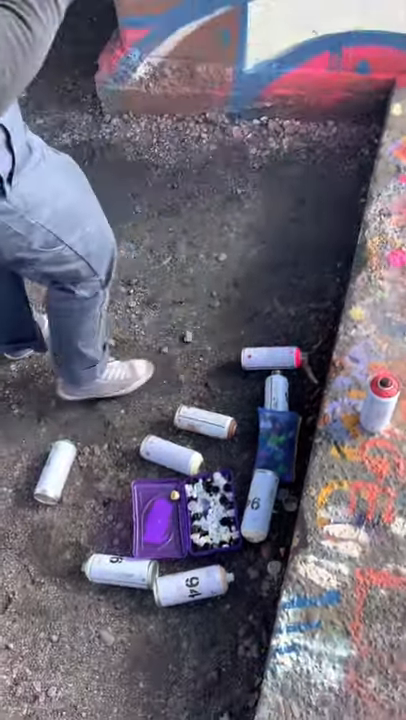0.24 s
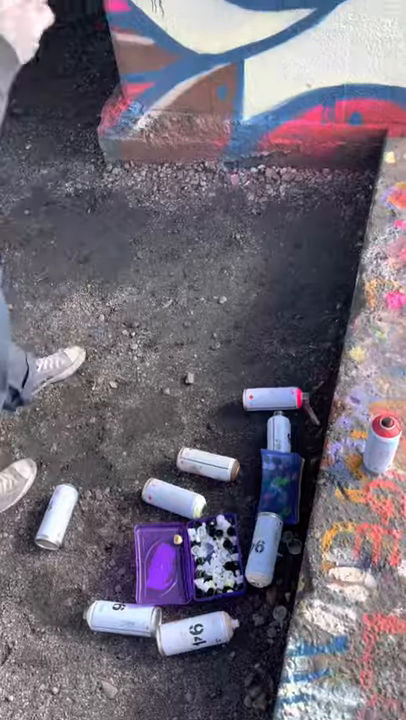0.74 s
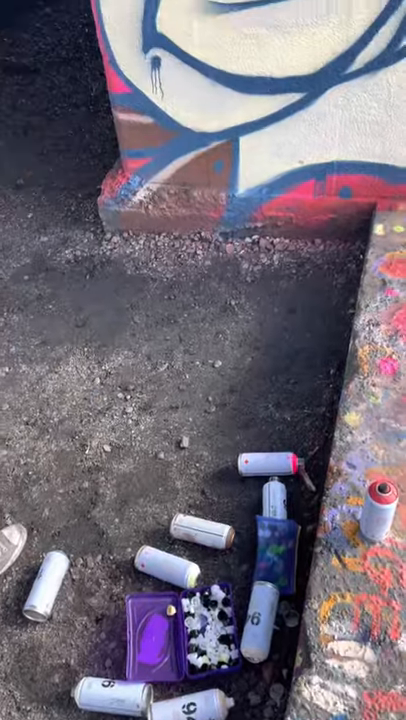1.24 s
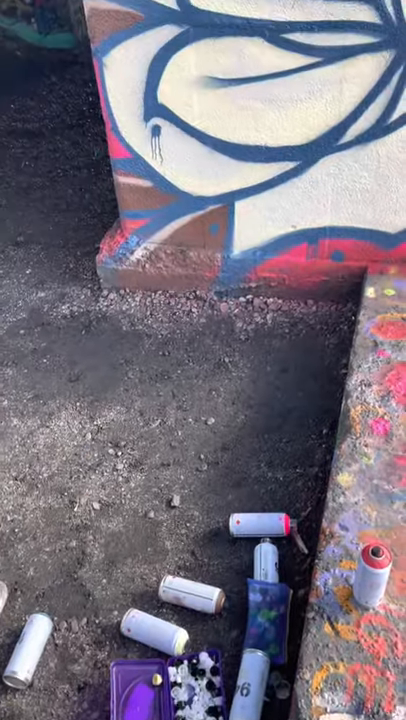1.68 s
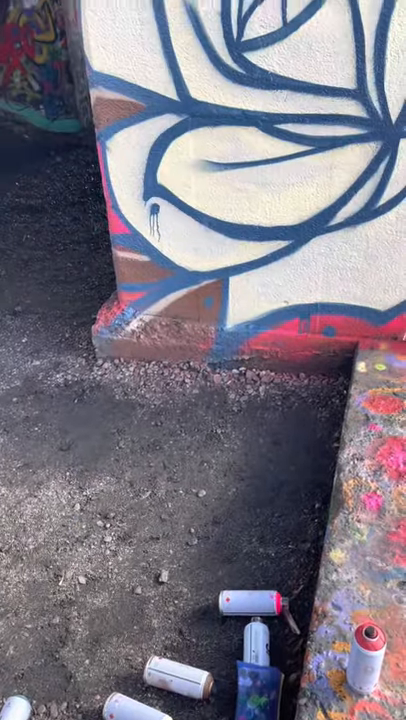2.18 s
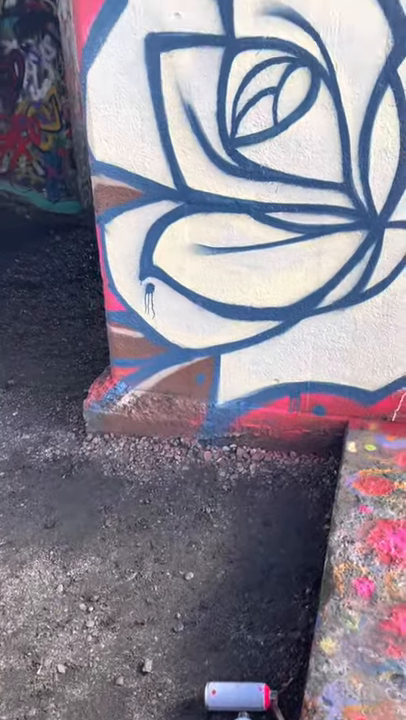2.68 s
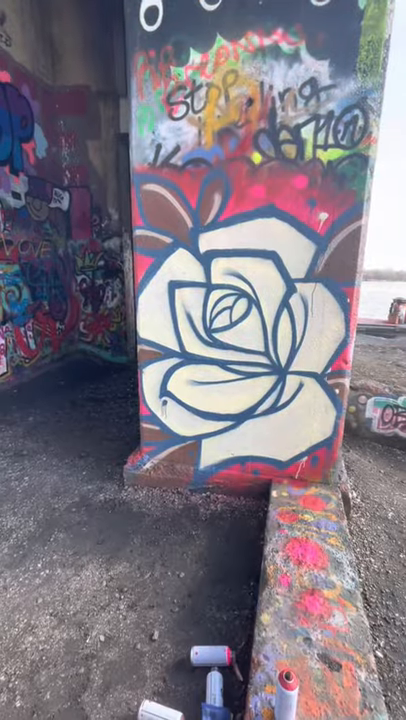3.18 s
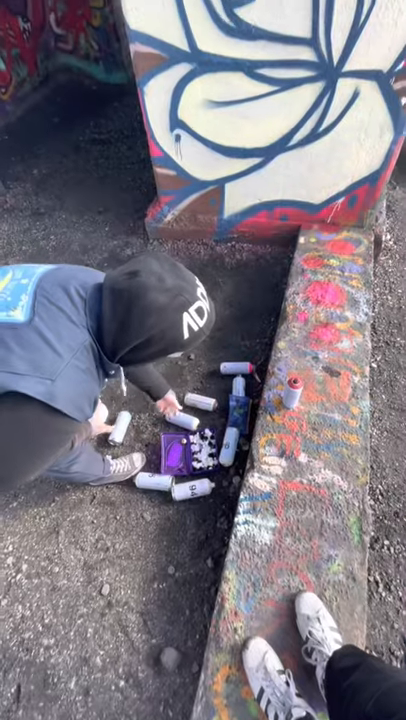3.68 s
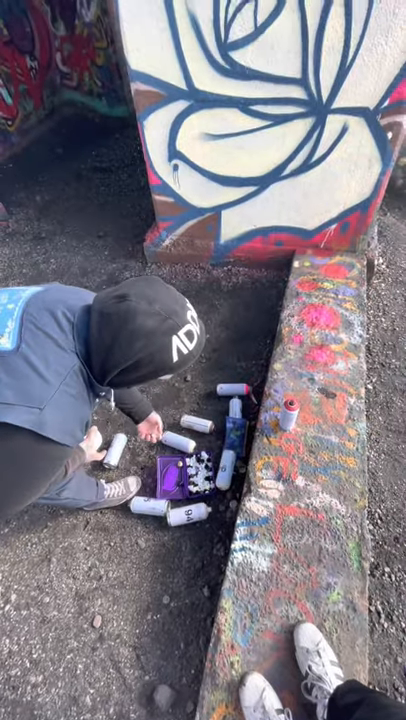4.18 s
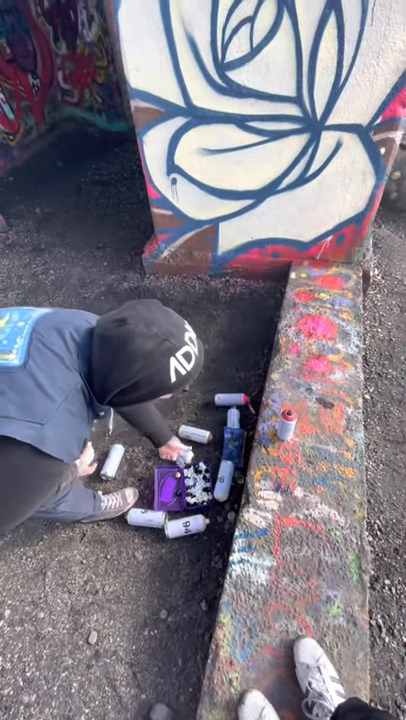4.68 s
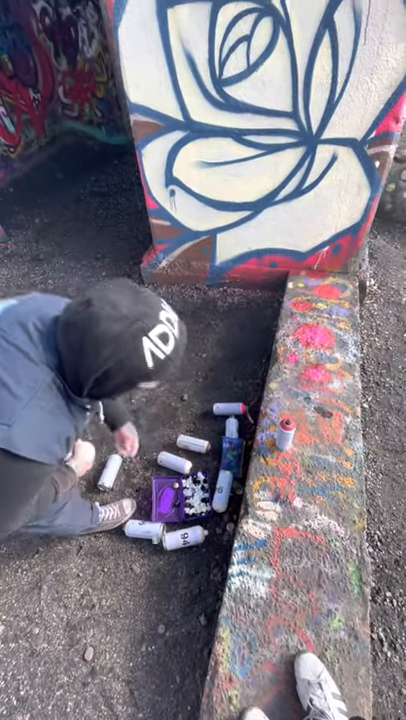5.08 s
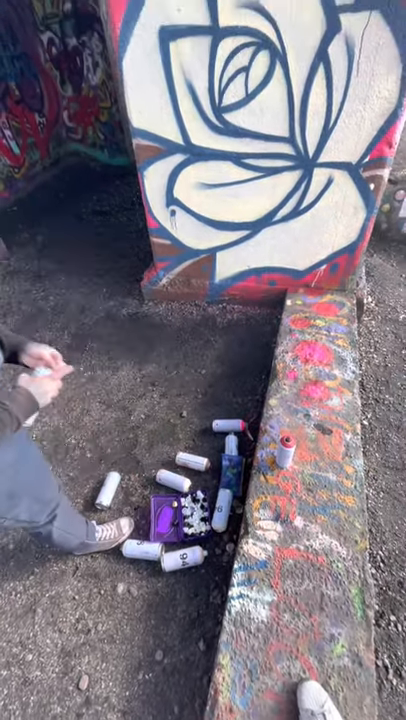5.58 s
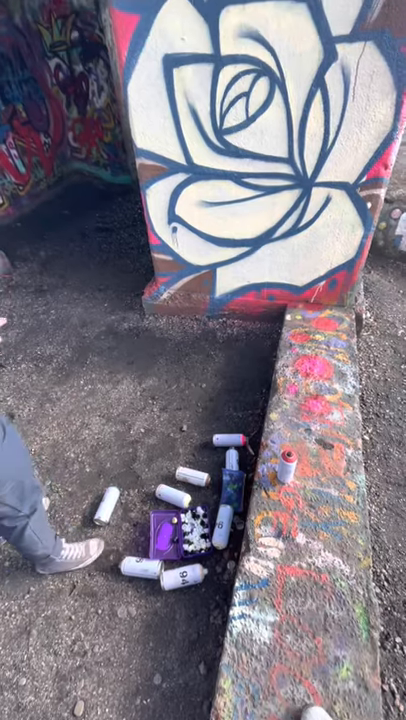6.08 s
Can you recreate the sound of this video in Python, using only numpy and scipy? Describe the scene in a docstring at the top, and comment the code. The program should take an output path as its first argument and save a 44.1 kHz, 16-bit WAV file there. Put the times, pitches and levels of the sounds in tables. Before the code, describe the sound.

Outdoors beside concrete, a spray paint can is shaken close by: its mixing ball clatters in a fast, uneven, bright metallic run with a short grainy echo. The rattle stops abruptly near the middle. After a brief lull, cans and caps are handled on the ground with scattered ticks, hollow knocks and faint short rings. Wind flutters and pops on the phone microphone.

```python
"""Spray can and caps in the wind

A spray paint can is shaken beside a concrete shelter: its mixing ball strikes and skips along the shell,
each contact a burst of noise through the can's resonances, with a grainy echo from the concrete.
Then cans and caps are picked through on the ground: filtered ticks, hollow knocks and short sine rings.
Wind flutters and pops on the microphones throughout, as shaped noise bursts, over a fine rustle
of cloth and grit and a faint, steady outdoor wash of filtered noise.
"""
import sys
import numpy as np
from scipy import signal
from scipy.fft import rfft, irfft
from scipy.io import wavfile
from scipy.ndimage import uniform_filter1d

SR = 44100
rng = np.random.default_rng(int(sys.argv[2]) if len(sys.argv) > 2 else 0)


def transcribe(signal):
    """Save signal, clipped to [-1, 1], as a 16-bit WAV file at the path in sys.argv[1]."""
    frames = np.atleast_2d(signal).T
    limited = np.clip(frames, -1, 1)
    pcm = np.round(limited * 32767).astype(np.int16)
    wavfile.write(sys.argv[1], SR, pcm)


N = 279594
TIME = np.arange(N) / SR

# every short hit has its own frame, in samples, with a little silence ahead of the onset
HIT, LEAD = 4096, 256
HIT_TIME = (np.arange(HIT) - LEAD) / SR
HIT_HZ = np.fft.rfftfreq(HIT, 1 / SR) + 1

# Wall modes of the shaken can.
# Each row: frequency in Hz, half width in Hz, peak in dB over the broad response.
WALL_MODES = [(3950, 150, 0), (4380, 65, -7), (4980, 40, -4), (5250, 50, -5), (5640, 65, -7),
              (6360, 80, -2), (7000, 65, -4), (7320, 45, -3), (10440, 80, -2)]
# resonances of the struck can: (centre in Hz, half width in octaves)
HOLLOW_BODY, SHARP_EDGE = (1720, 0.62), (10240, 0.2)
SHELL_OCTAVES = 0.41  # typical half width of the thin shell's broad resonance
SHAKE_END_S = 2.85


def shaken_can(shell_db=0.22, edge_db=-0.5, body_db=2, thud_db=-19, mode_scatter_db=6, width_scatter=0.22):
    """The ball hits the can and skips along the wall; each contact has its own colour and mix of wall modes."""
    s, db, edge, body, shell_hz = ball_path()
    count = len(s)
    strikes = contacts(count, crack_s=0.0005, shiver_s=0.0046, shiver_db=-18.5, lag_ms=0.1631, chatter_db=7.0)

    mix = undb(mode_scatter_db * rng.standard_normal((count, 1, len(WALL_MODES))))
    modes = [undb(peak) / (1 + 1j * (HIT_HZ - hz) / width) for hz, width, peak in WALL_MODES]
    wall = 1 + mix @ np.array(modes)
    octaves = SHELL_OCTAVES * np.exp(width_scatter * rng.uniform(-0.96, 1, (count, 1, 1)))
    shell = bump(shell_hz[:, None, None], octaves)

    hits = voiced(strikes, shell * wall, db + shell_db)
    hits += voiced(strikes, bump(*SHARP_EDGE) * wall, db + edge + edge_db)
    hits += voiced(strikes, bump(*HOLLOW_BODY), db + body + body_db)
    thuds = voiced(strikes, bump(496, 1.9), db + .5 * body + thud_db)

    # the low thuds are heard direct only
    echo = shelter(place(s, hits), t60_s=0.4, wet_db=-5.5, build_s=0.0014, wall_s=0.043, wall_db=-13)
    clatter = place(s, hits + thuds) + echo
    # the clatter and its echo stop short
    return clatter * np.clip((SHAKE_END_S - TIME) / 0.013, 0, 1)


# Strikes of the ball on the can, before the layer trims.
# Each row: start in seconds, shell level in dB, sharp edge in dB re shell, hollow body in dB re shell,
# shell centre in Hz.
BALL_STRIKES = [(0.1333, -21.5, 5, -4, 7060), (0.151, -16, -16, -13, 5600), (0.1707, -21, 0, -9, 5500),
                (0.1756, -15, -26, -12, 5700), (0.2455, -17, 1, -13, 5240), (0.3128, -7, -6.5, -16, 4700),
                (0.319, -12.5, -13, -26, 5300), (0.3564, -7, -4, -25.5, 4980), (0.3624, -8, -22, -23, 5860),
                (0.4628, -22.5, 14, -6, 6150), (0.4646, -15.5, 5, -8.5, 5600), (0.4694, -27, 10, -7, 7200),
                (0.5434, -13, -3.5, -20, 5500), (0.5468, -17, 7, -19, 5900),
                (0.5513, -9.5, -17, -23.5, 4580), (0.6675, -17, -1, -6.5, 5300),
                (0.6822, -20, 7, -10, 4550), (0.6886, -23, 7, -17, 5900), (0.8094, -13, 2, -17.5, 5100),
                (0.815, -5.5, -9, -34, 5140), (0.8315, -13, 2.5, -12.5, 5260),
                (0.8411, -13.5, -21, -19, 6150), (0.9164, -14.5, -5, -9, 4800),
                (0.942, -25.5, 8, -0.5, 5200), (1.011, -19, -25, -9.5, 6200),
                (1.0568, -8.5, -20, -27, 5800), (1.0589, -9, -6, -19, 5300), (1.0652, -13, -2.5, -26, 5600),
                (1.0779, -13, -1, -36, 6150), (1.0847, -11, -3, -39, 6460), (1.176, -18.5, 1, -5, 6350),
                (1.181, -19.5, 7.5, -4, 5550), (1.3027, -14, -9, -11.5, 4600),
                (1.3137, -12.5, -3, -9, 7040), (1.323, -15.5, -7, -29, 6170), (1.3417, -22, -4, -7, 6100),
                (1.4243, -18, -1.5, -4, 5470), (1.4309, -16.5, -1.5, -0.5, 4660),
                (1.4804, -23.5, -2, -7, 5260), (1.5342, -18, -4, -7, 7400), (1.5373, -6, -13, -21, 4350),
                (1.545, -16.5, -4, -29, 6500), (1.5725, -12, -12, -18, 6900), (1.5804, -18.5, 3, -25, 7650),
                (1.6772, -15.5, -4, -9, 4370), (1.7503, -17, -3, -5, 5030), (1.8511, -18.5, -8, -18, 5900),
                (1.857, -17.5, -22, -14, 5270), (1.8736, -20.5, -8, -3.5, 5600),
                (1.9566, -21.5, 2, 1, 5700), (1.9606, -17, -8, -3, 4160), (1.9862, -22.5, -1, -12, 4800),
                (2.0482, -16.5, -5, -5, 5370), (2.0955, -14.5, 4.5, -17, 6270),
                (2.1014, -13.5, -10, -13, 5100), (2.105, -16, 1, -32, 7600),
                (2.1993, -14.5, -12, -6.5, 4500), (2.2101, -21.5, 2, -1.5, 5200),
                (2.2981, -9, -21, -19.5, 5350), (2.4259, -17, -2.5, -5, 4970),
                (2.5651, -8.5, -6, -20.5, 5550), (2.571, -10, -13, -23, 5800), (2.6566, -26, -1, 1.5, 4460),
                (2.6625, -24.5, 0.5, -3, 5830), (2.781, -9.5, -3.5, -20, 5160)]
# typical gap and its spread; first loss re the strike, and further loss per skip
SKIP_GAP_S, SKIP_JITTER, SKIP_LOSS_DB, SKIP_FADE_DB = 0.0053, 0.35, 10.5, 4


def ball_path(count=30, graze_db=-33, scatter_db=3, order=3):
    """Strikes, a few weaker skips after each, and chance grazes between, in BALL_STRIKES columns."""
    strikes = np.array(BALL_STRIKES, float)
    contacts_so_far = [strikes]
    for k in range(order):
        skips = contacts_so_far[-1].copy()
        skips[:, 0] += SKIP_GAP_S * np.exp(SKIP_JITTER * rng.standard_normal(len(skips)))
        scatter = scatter_db * rng.uniform(-0.61, 1, len(skips))
        skips[:, 1] = strikes[:, 1] - SKIP_LOSS_DB - k * SKIP_FADE_DB + scatter
        contacts_so_far.append(skips)

    # grazes borrow the colour of a random strike
    grazes = strikes[rng.integers(len(strikes), size=count)]
    spread = (np.arange(count) + rng.random(count)) / count
    grazes[:, 0] = np.interp(spread, [0, 1], [strikes[0, 0], strikes[-1, 0]])
    scatter = scatter_db * np.clip(rng.standard_normal(count), -2, 2)
    grazes[:, 1] = graze_db + scatter - np.maximum(grazes[:, 2], 0)
    return np.vstack(contacts_so_far + [grazes]).T


# Hollow resonances of a knocked can.
# Each row: multiple of its ring pitch, half width in octaves, level in dB.
HOLLOW_MODES = [(.48, 0.18, -2.5), (.72, 0.25, -3.5), (.99, 0.12, 1), (1.18, .09, -4.5), (1.42, 0.11, -8.5)]
# Colour of a cap's tick. Each row: frequency in Hz, gain in dB.
TICK_COLOUR = [(200, -5), (1000, -29), (3000, 1.5), (4200, 10.5), (6200, 5), (8500, 4), (10600, 16.5),
               (12000, 4.5), (13500, -24)]
# Partials of a lightly touched can. Each row: multiple of its ring pitch, level in dB.
RING_PARTIALS = [(1, -4), (1.06, -11.5), (1.66, -24)]
RING_T60_S = .045
RING_PAN_DB = -5  # left minus right: rings are louder at the right port


def handled_cans(knock_echo_db=-2, ring_echo_db=-9, lead_radians=0.97):
    """Each touch gives a tick, a hollow knock and a short ring; the ring excites little echo."""
    s, tick, knock, ring_hz, ring = touches()
    pitch = ring_hz[:, None, None]
    sides = np.array([[.5], [-.5]])

    taps = contacts(len(s), crack_s=0.00044, shiver_s=0.01, shiver_db=-13.0, lag_ms=0.1562, chatter_db=2)
    ticks = voiced(taps, colour(TICK_COLOUR, HIT_HZ), tick)

    blows = contacts(len(s), crack_s=0.00018, shiver_s=0.0025, shiver_db=-10.0, lag_ms=0.46, chatter_db=0.0)
    hollow = sum(undb(db) * bump(multiple * pitch, width) for multiple, width, db in HOLLOW_MODES)
    # around the ring pitch the ports differ in level and phase
    lean = sides * bump(pitch, 0.38)
    panned = hollow * undb(RING_PAN_DB * lean) * np.exp(1j * lead_radians * lean)
    knocks = voiced(blows, panned, knock)

    age = np.maximum(HIT_TIME, 0)
    decay = np.exp(-np.log(1000) * age / RING_T60_S)
    partials = sum(undb(db) * np.sin(2 * np.pi * multiple * pitch * age) for multiple, db in RING_PARTIALS)
    rings = partials * decay * undb((knock + ring)[:, None, None] + RING_PAN_DB * sides)

    sent = place(s, ticks + undb(knock_echo_db) * knocks + undb(ring_echo_db) * rings)
    echo = shelter(sent, t60_s=0.32, wet_db=-3.5, build_s=0.0014, wall_s=.039, wall_db=-24, grain_db=6)
    return place(s, ticks + knocks + rings) + echo


# Cans and caps handled.
# Each row: start in seconds, tick in dB, hollow knock in dB, ring in Hz, ring in dB re knock.
CAN_TOUCHES = [(3.397, -32, -66, 1680, -20), (3.4497, -20, -12.5, 1730, -29), (3.4524, -16, -11, 1720, -12),
               (3.49, -23.5, -44, 1680, -20), (3.5586, -24.5, -17.5, 1670, -14),
               (3.5655, -25, -46, 1683, -15), (3.667, -27, -32, 1750, -9), (3.854, -37.5, -39.5, 1714, 1),
               (4.7873, -18, -21, 2050, -19), (4.7892, -24, -19, 2070, -19), (4.795, -25, -11.5, 2035, -8),
               (4.9227, -30, -36, 2040, 10), (5.116, -31.5, -43, 2120, 9.5),
               (5.1926, -36, -36.5, 2090, 9.5), (5.691, -56.5, -43, 2030, 16),
               (5.7875, -21, -34, 2030, -22), (5.7945, -24, -50, 2030, -20), (5.802, -20, -42, 2020, -17),
               (5.8068, -24.5, -50, 2020, -17), (5.8808, -25.5, -46, 2050, -24), (5.927, -28, -34, 2270, 0),
               (6.015, -28.5, -36, 2110, -10)]
# whatever is touched settles with one softer bounce
SETTLE_S, SETTLE_DB = 0.012, -22.5


def touches():
    """Every touch and the bounce with which it settles, in the columns of CAN_TOUCHES."""
    rows = np.array(CAN_TOUCHES)
    bounces = rows + [SETTLE_S, SETTLE_DB, SETTLE_DB, 0, 0]
    return np.vstack([rows, bounces]).T


PORT_SPLIT_HZ = 4100  # the two ports disagree most in phase around here


def contacts(count, crack_s, shiver_s, shiver_db, lag_ms, chatter_db):
    """Spectra of contacts: a crack, then a ragged shiver of thin metal; treble reaches the left port first."""
    noise = rng.standard_normal((count, 5, HIT))
    age, begun = np.maximum(HIT_TIME, 0), HIT_TIME >= 0
    crack = noise[:, :1] * np.exp(-age / crack_s)

    raggedness = np.clip(unit(uniform_filter1d(noise[:, 4:], size=50)), -2, 2)
    chatter = unit(undb(chatter_db * raggedness))
    ports = noise[:, 1:2] + .3 * noise[:, 2:4]
    shiver = ports * chatter * np.exp(-age / shiver_s) * undb(shiver_db)

    # the lag grows in from 3 to 6 kHz
    lag_s = (lag_ms + .008 * noise[:, :1, :1]) / 1000 * np.array([[-.5], [.5]])
    treble = np.clip((HIT_HZ - 3000) / 3000, 0, 1)
    scatter = 1.2 * noise[:, 2:4, :1] * bump(PORT_SPLIT_HZ, .35)
    phase = scatter - 2 * np.pi * HIT_HZ * treble * lag_s
    return rfft((crack + shiver) * begun) * np.exp(1j * phase)


# Colour of the shelter's echo. Each row: frequency in Hz, gain in dB.
ECHO_COLOUR = [(100, -25), (500, -3), (1700, -1), (3000, -1), (5500, -2), (8500, -5), (11000, -5.5),
               (13000, -18)]


def shelter(x, t60_s, wet_db, build_s, wall_s, wall_db, grain_db=5, size=16384):
    """The concrete's grainy tail and one clear wall echo; the pattern changes as the cans move."""
    t = TIME[:2 * size]
    fade = np.sin(np.pi * np.arange(size) / size)
    padded, wet = np.pad(x, ((0, 0), (size, size))), np.zeros((2, 2 * N))
    # overlapping blocks, each with a fresh tail
    for start in range(0, N + size, size // 2):
        noise = rng.standard_normal((4, len(t)))
        grains = undb(grain_db * np.clip(unit(uniform_filter1d(noise[3], size=60)), -2, 2))
        envelope = undb(-60 * t / t60_s) * (1 - np.exp(-t / build_s))
        tail = (noise[0] + .35 * noise[1:3]) * grains * envelope
        tail /= np.sqrt(np.sum(tail ** 2, axis=1, keepdims=True))
        tail[:, int(wall_s * SR)] += undb(wall_db)
        answer = signal.fftconvolve(padded[:, start:start + size] * fade, tail, axes=1)
        wet[:, start:start + answer.shape[1]] += answer
    return undb(wet_db) * tint(wet[:, size:size + N], ECHO_COLOUR)


# Wind on the microphones, before the surges. Each row: time in seconds, level in dB.
WIND_LEVEL = [(0, -42), (.14, -31), (.23, -48), (.3, -39.5), (.56, -56), (.68, -44.5), (.85, -34.5),
              (1.0, -53), (1.07, -51), (1.1, -35), (1.26, -37), (1.32, -40), (1.46, -34.5), (1.68, -45.5),
              (1.85, -36.5), (2.02, -33), (2.25, -35.5), (2.46, -44), (2.54, -31.5), (2.65, -51.5),
              (2.82, -32.5), (2.88, -57), (3.15, -69), (3.6, -47), (3.8, -52.5), (3.92, -44), (4.0, -51.5),
              (4.11, -31), (4.145, -41), (4.22, -35.5), (4.3, -45.5), (4.37, -42.5), (4.41, -34),
              (4.45, -48.5), (4.5, -43), (4.54, -39), (4.6, -48.5), (4.68, -42.5), (4.75, -45.5),
              (4.87, -43.5), (4.97, -38), (5.11, -45.5), (5.17, -43.5), (5.215, -53), (5.27, -43),
              (5.39, -45), (5.56, -42.5), (5.66, -50), (5.7, -52), (5.75, -42.5), (5.9, -47), (5.96, -36),
              (6.11, -51.5), (6.14, -41.5), (6.175, -40.5), (6.195, -48), (6.34, -42)]
# Moving bass edge of all but the shaken can, and tilt of the flutter.
# Each row: time in seconds, bass edge in Hz, tilt in dB per octave.
EDGE_AND_TILT = [(0, 484, -3.5), (.6, 274, -5), (.8, 194, -11), (1.0, 270, 1), (1.3, 153, -7.5),
                 (1.55, 140, -4.5), (1.8, 283, 0), (2.3, 339, -7), (2.8, 286, -8), (2.95, 380, 10.5),
                 (3.25, 151, -5.5), (4.0, 149, -4), (4.21, 275, 3), (4.3, 302, -2.5), (4.7, 540, 1),
                 (4.85, 374, -1), (5.2, 380, 5), (5.45, 343, 1), (5.7, 320, 0.5), (5.85, 264, -3),
                 (6.05, 490, 10), (6.34, 700, 6)]
# Colour of the flutter before its tilt. Each row: frequency in Hz, gain in dB.
FLUTTER_COLOUR = [(120, -18), (300, 2.5), (500, 7.5), (900, 7), (1500, -1), (2100, -5.5), (2700, -20.5),
                  (3500, -38), (6000, -45)]


def flutter(surge_db=2, surge_s=0.029, eddy_db=6, eddy_s=0.0032, side_db=-9):
    """Eddies break on the ports as dull, very unequal millisecond bursts, in quick surges and lulls."""
    level_db, = curves(WIND_LEVEL)
    air = rng.standard_normal((3, N)) * undb(eddy_db * np.clip(walk(eddy_s), -2, 1.7))
    ports = air[0] + undb(side_db) * air[1:]
    hz, s, frames = signal.stft(ports, SR, nperseg=256)
    # the flutter turns darker and brighter along a set curve
    slope = np.interp(s, TIME, curves(EDGE_AND_TILT)[1])
    octaves = np.log2(np.clip(hz, 350, 2000) / 850)[:, None]
    gain = colour(FLUTTER_COLOUR, hz)[:, None] * undb(slope * octaves)
    bursts = signal.istft(frames * gain, SR, nperseg=256)[1][:, :N]
    # level out the slow loudness, then follow the wind level
    loudness = np.sqrt(uniform_filter1d(np.mean(bursts ** 2, axis=0), size=3000) + 1e-12)
    return bursts / loudness * undb(level_db + surge_db * walk(surge_s))


# The strongest buffets, before the trims of level and pitch.
# Each row: start in seconds, level in dB, centre in Hz.
STRONG_BUFFETS = [(.0884, -13, 1010), (.099, -19.5, 860), (.1432, -15.5, 760), (.207, -20, 1480),
                  (.2223, -18, 755), (1.1862, -16.5, 820), (1.2938, -11, 620), (1.4506, -16.5, 473),
                  (1.4749, -10.5, 580), (1.531, -16.5, 630), (1.565, -15.5, 647), (2.0023, -18, 883),
                  (2.041, -9, 730), (2.345, -18, 720), (2.3772, -18, 660), (2.51, -20, 695),
                  (4.0598, -18.5, 1020), (4.1004, -19, 1150), (4.1082, -16, 1120), (4.169, -25.5, 850),
                  (4.3464, -22.5, 1160), (4.4076, -21, 1210), (4.655, -24.5, 1130), (4.724, -25, 1090),
                  (4.771, -27.5, 755), (4.844, -23, 1000), (4.9822, -22, 1100), (5.02, -19.5, 890),
                  (5.074, -23, 1040), (5.0849, -23, 890), (5.1535, -17, 1120), (5.177, -21, 1050),
                  (5.2548, -22, 1120), (5.29, -26.5, 1250), (5.3057, -22.5, 1120), (5.352, -26, 1080),
                  (5.4169, -13, 1130), (5.544, -28, 900), (5.562, -28, 1100), (5.5934, -21, 1340),
                  (5.9867, -23, 1630), (6.149, -24, 1540)]


def buffets(pop_db=-1.0, swirl_db=-21, swirl_cycles=1.97, side_db=-6, apart_radians=0.25):
    """Larger eddies: a pop inside a brief swirl; the lower the pop, the longer the swirl."""
    s, db, hz = np.vstack([STRONG_BUFFETS, stray_buffets()]).T
    hz = hz[:, None, None]
    chance = rng.standard_normal((len(s), 3, HIT))
    # an impulse at the onset, with a random phase that differs a little between the ports
    phase = np.pi * chance[:, :1, :1] + apart_radians * chance[:, 1:, :1]
    pop = np.exp(1j * phase - 2j * np.pi * HIT_HZ * LEAD / SR)
    envelope = np.exp(-.5 * (HIT_TIME * hz / swirl_cycles) ** 2)
    swirl = (chance[:, :1] + undb(side_db) * chance[:, 1:]) * envelope
    dull = 1 / np.sqrt(1 + (HIT_HZ / 2750) ** 12)
    spectra = pop + undb(swirl_db) * rfft(swirl)
    return place(s, voiced(spectra, dull * bump(0.89 * hz, 0.59), db + pop_db))


def stray_buffets(count=30, over_wind_db=8.5, scatter_db=2.5, centre_hz=1050, tilt_follow=0.033,
                  scatter_octaves=0.1):
    """Small chance buffets in STRONG_BUFFETS columns; they follow the wind level and the flutter's tilt."""
    s = (np.arange(count) + rng.random(count)) / count * TIME[-1]
    size, pitch = np.clip(rng.standard_normal((count, 2)), -2, 2).T
    db = np.interp(s, *np.transpose(WIND_LEVEL)) + over_wind_db + scatter_db * size
    tilt = np.interp(s, TIME, curves(EDGE_AND_TILT)[1])
    hz = centre_hz * 2 ** (tilt_follow * tilt + scatter_octaves * pitch)
    return np.column_stack([s, db, hz])


# Rustle of clothes, paint and grit, before the trim. Each row: time in seconds, level in dB.
RUSTLE_LEVEL = [(0, -33), (.06, -33.5), (.12, -45), (.6, -40), (1.3, -40.5), (2.83, -42), (2.9, -52),
                (3.19, -68), (3.27, -51), (3.44, -49.5), (3.58, -41.5), (3.8, -59.5), (4.3, -53.5),
                (4.72, -69.5), (4.95, -52.5), (5.3, -57.5), (6.06, -44.5), (6.2, -58.5)]
# Colour of the rustle. Each row: frequency in Hz, gain in dB.
RUSTLE_TONE = [(200, -14), (1500, 8), (4000, 5), (6500, 3.5), (8800, -6.5), (10700, 7), (12000, -3.5),
               (14000, -60)]


def rustle(rustle_db=-3, grit_db=3):
    """Cloth and grit make a fine, uneven hiss: noise with a random, fast-moving level."""
    level_db, = curves(RUSTLE_LEVEL)
    grit = undb(grit_db * unit(uniform_filter1d(rng.standard_normal(N), size=150)))
    hiss = tint(rng.standard_normal((2, N)) * grit, RUSTLE_TONE)
    return unit(hiss) * undb(level_db + rustle_db)


# Colour of the outdoor wash. Each row: frequency in Hz, gain in dB.
WASH_COLOUR = [(100, -35.5), (200, 0), (400, -5.5), (800, 6.5), (1200, -1.5), (2000, -10), (3500, -26.5),
               (8000, -23.5), (11000, -36), (13000, -100)]


def outdoor_wash(wash_db=-51):
    """The far outdoors blurs into steady, coloured noise, independent at each port."""
    return unit(tint(rng.standard_normal((2, N)), WASH_COLOUR)) * undb(wash_db)


def thinned(x):
    """Take away the bass below a steep, slowly moving edge, down to a floor of -40 dB."""
    hz, s, frames = signal.stft(x, SR, nperseg=2048)
    edge_hz = np.interp(s, TIME, curves(EDGE_AND_TILT)[0])
    gain = 1 / np.sqrt(1 + (edge_hz / (hz[:, None] + 1)) ** 24) + undb(-40)
    return signal.istft(frames * gain, SR, nperseg=2048)[1][:, :N]


def undb(db):
    """Decibels to gain."""
    return 10 ** (np.asarray(db) / 20)


def curves(table):
    """Each column of a table as a value per sample."""
    s, *columns = np.transpose(table)
    return [np.interp(TIME, s, c) for c in columns]


def colour(points, hz):
    """Gain of a (Hz, dB) spectrum at the given frequencies."""
    f, db = np.transpose(points)
    return undb(np.interp(np.log(hz + 1), np.log(f), db))


def tint(x, points):
    """Filter a whole track with a spectrum."""
    return irfft(rfft(x) * colour(points, np.fft.rfftfreq(N, 1 / SR)), N)


def unit(x):
    """Scale to rms 1."""
    return x / np.sqrt(np.mean(x ** 2))


def walk(span_s):
    """A smooth random wander that changes over span_s, with rms 1."""
    size = max(2, int(span_s * SR))
    return unit(uniform_filter1d(uniform_filter1d(rng.standard_normal(N), size), size))


def bump(hz, octaves):
    """A broad resonance: a bell on the octave axis."""
    return np.exp(-.5 * (np.log2(HIT_HZ / hz) / octaves) ** 2)


def voiced(spectra, gain, db):
    """Filter each hit and give it the energy of one millisecond at db."""
    hits = irfft(spectra * gain, HIT)
    port_energy = np.sum(hits ** 2, axis=-1, keepdims=True)
    energy = np.mean(port_energy, axis=1, keepdims=True) * 1000 / SR
    return hits / np.sqrt(energy) * undb(db)[:, None, None]


def place(times, hits):
    """Lay stereo hits on the time line, onsets at the given times."""
    out = np.zeros((2, N + 2 * HIT))
    for s, hit in zip(times, hits):
        start = int(s * SR)
        out[:, start:start + HIT] += hit
    return out[:, LEAD:LEAD + N]


# Overall level, which dips briefly; the first and last gains hold outward.
# Each row: time in seconds, gain in dB.
LEVEL_DIPS = [(2.838, -2.5), (2.856, -5.5), (2.868, -18), (2.885, 3.5), (3.37, 6), (3.386, -15.5),
              (3.395, 2.5)]


def scene():
    """Can, caps, wind, rustle and the far outdoors together; the bass cut spares the shaken can."""
    around = thinned(flutter() + buffets() + outdoor_wash() + rustle() + handled_cans())
    dip_db, = curves(LEVEL_DIPS)
    return (shaken_can() + around) * undb(dip_db)


def record(dry):
    """The phone softens the highest treble, caps the highest peaks and cuts the top."""
    heard = tint(dry, [(11500, 1.0), (12500, -12.0), (14000, -16), (16000, -4)])  # (Hz, dB)
    top_cut = signal.ellip(8, .2, 70, 16600, fs=SR, output="sos")
    return signal.sosfilt(top_cut, np.clip(heard, -1, 1))


dry = scene()
out = record(dry)
transcribe(out)
```